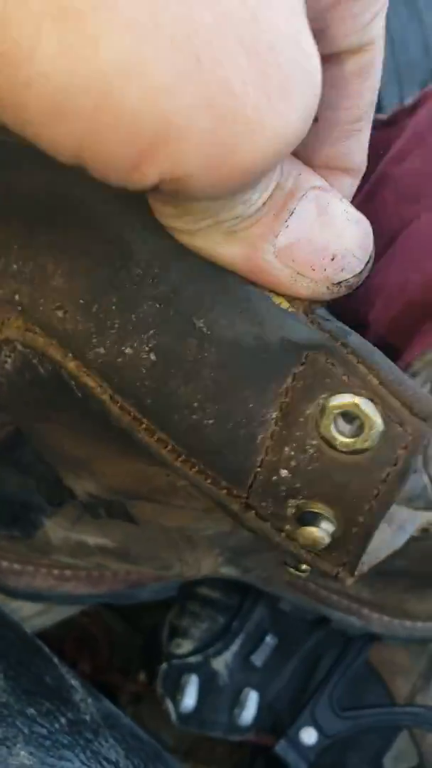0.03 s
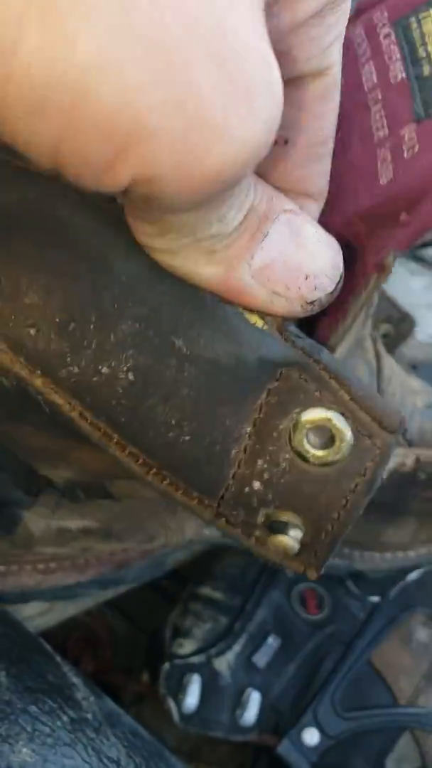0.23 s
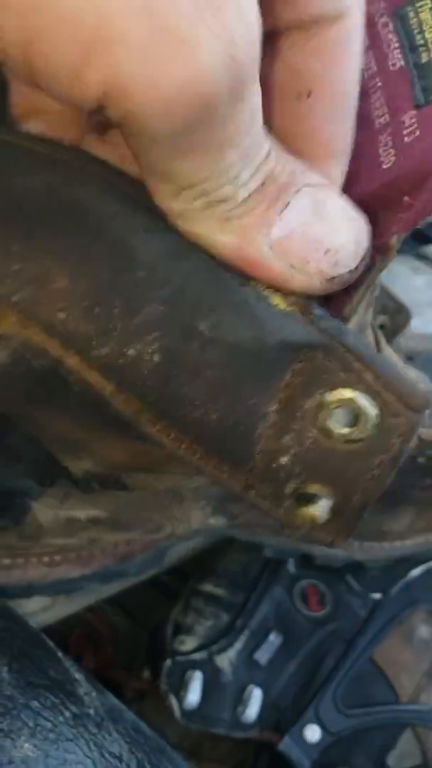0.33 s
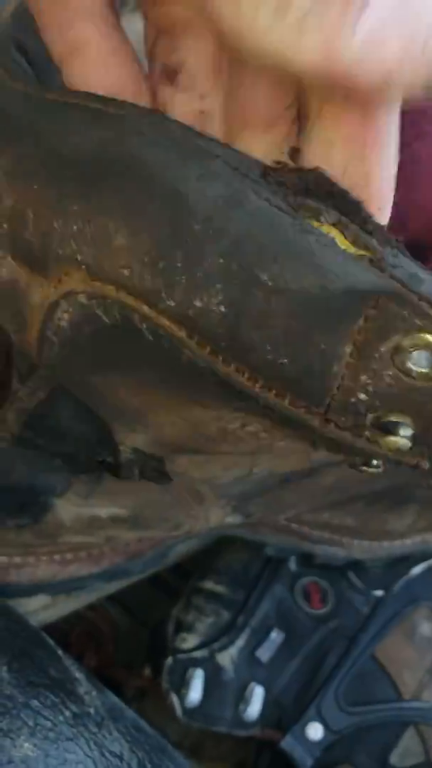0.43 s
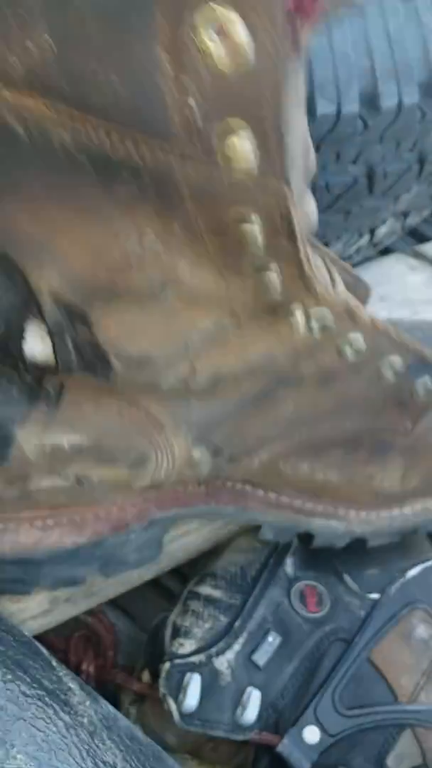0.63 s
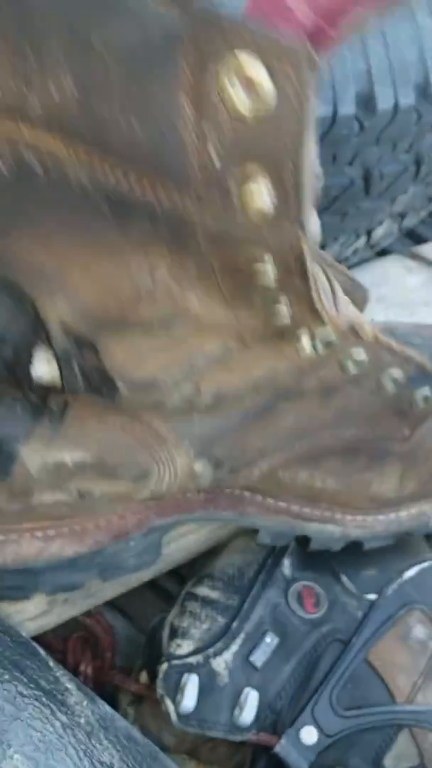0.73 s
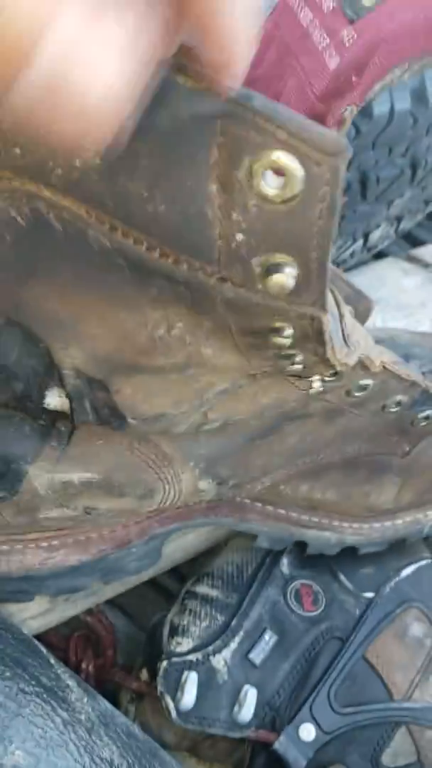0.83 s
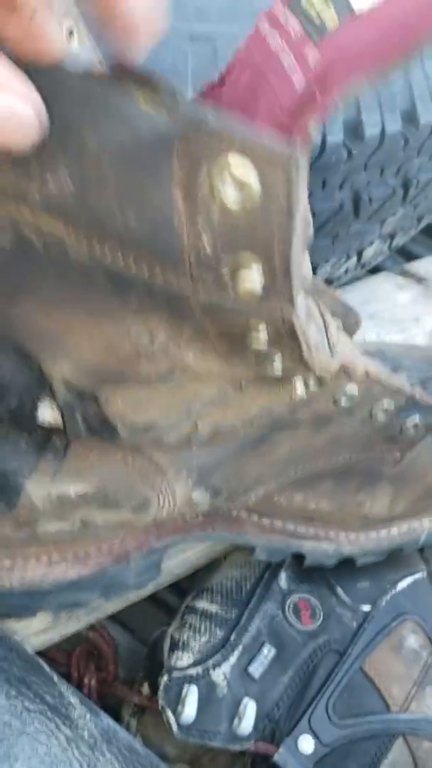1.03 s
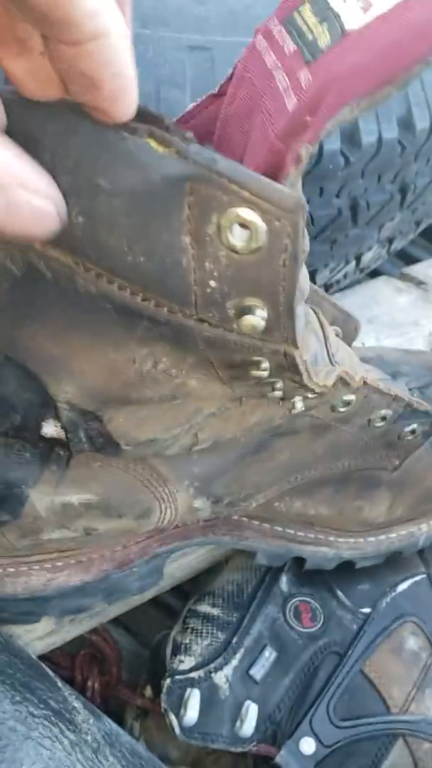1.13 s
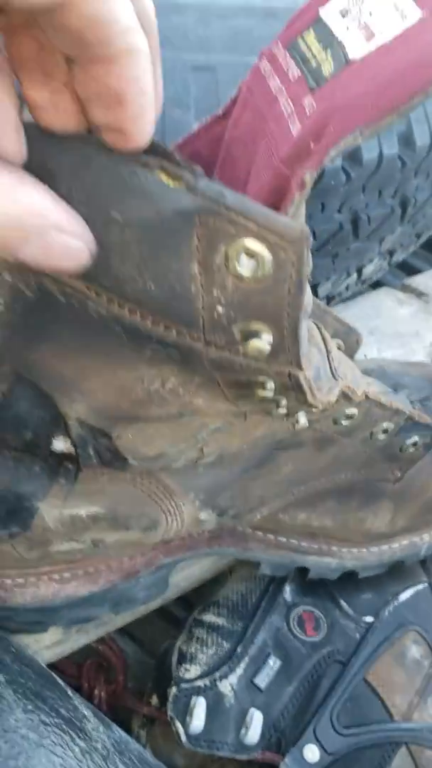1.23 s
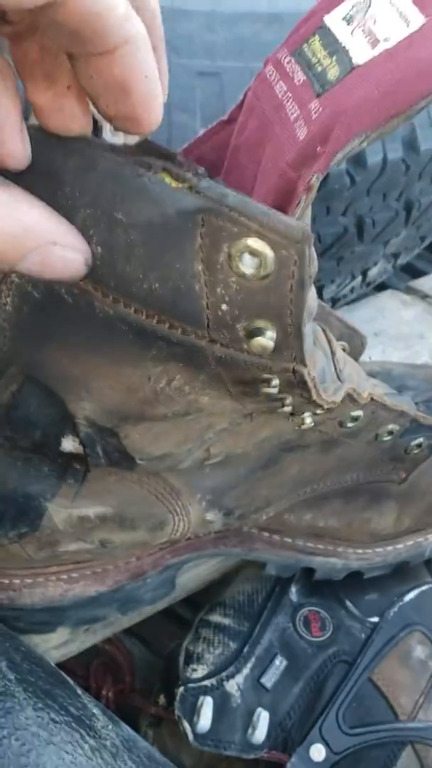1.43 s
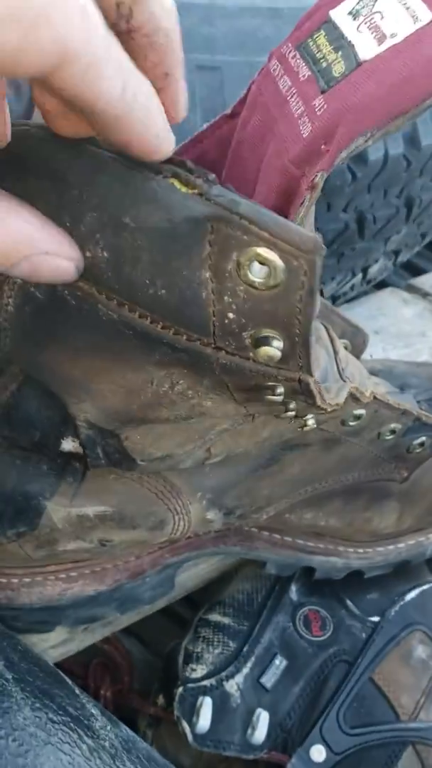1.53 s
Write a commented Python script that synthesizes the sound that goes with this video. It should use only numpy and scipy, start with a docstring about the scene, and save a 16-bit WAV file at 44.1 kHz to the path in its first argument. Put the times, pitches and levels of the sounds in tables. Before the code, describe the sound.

A stiff leather boot is flexed close to a hand-held stereo microphone in a quiet vehicle. Faint rustle and crisp ticks lead to a fast hollow knock at 0.2 s. Leather rubs and creaks briefly around 0.35 and 0.45 s, over low rumbling bumps mostly left. Another rub comes at 0.65 s, a bump with ticks near 0.95 s, then fading thumps to 1.3 s and faint hiss.

```python
"""A stiff leather boot is gripped and flexed close to a hand-held camera in a parked vehicle.
The shaft gives with a hollow knock: a few quick blows, each a set of fading tones.
The leather rubs and rustles as filtered trains of tiny clicks, and its folds creak in short tones.
Creases and metal eyelets tick with noise snaps and tiny rings; a faint hiss swells and fades around them,
with a narrow gliding band of noise. Rumbles and bumps reach mostly the left port, over faint noise."""
import sys
import numpy as np
from scipy import signal
from scipy.fft import rfft, irfft
from scipy.io import wavfile
from scipy.ndimage import uniform_filter1d

SR = 44100
rng = np.random.default_rng(int(sys.argv[2]) if len(sys.argv) > 2 else 0)


def dump_mix(stems):
    """Bounce the given channels to the path in sys.argv[1] as a 16-bit WAV at rate SR."""
    frames = np.atleast_2d(stems).T  # one column per channel
    limited = np.clip(frames, -1, 1)  # hard clip at full scale
    pcm = np.round(limited * 32767).astype(np.int16)
    wavfile.write(sys.argv[1], SR, pcm)


N = 70560  # length in samples, 1.6 s
EDGE_HZ = 16900  # upper limit of the sound


def amp(db):
    """Turns decibels into a gain."""
    return 10 ** (np.asarray(db) / 20)


def evened(x):
    """Scales a signal to an average (rms) strength of 1."""
    return x / np.sqrt(np.mean(x ** 2) + 1e-20)


def panned(pan_db):
    """Left and right gains of constant power; a positive pan makes the left louder."""
    return evened(amp([[pan_db / 2], [-pan_db / 2]]))


def add(mix, s, sound):
    """Mixes a sound in at a time in seconds."""
    part = mix[:, max(round(s * SR), 0):][:, :sound.shape[-1]]
    part += sound[..., :part.shape[1]]


def curve(points, axis=1):
    """Draws straight lines over time through one column of a table."""
    points = np.array(points)
    return np.interp(np.arange(N) / SR, points[:, 0], points[:, axis])


def coloured(x, points, axis=1):
    """Filters a signal by a spectrum drawn on a log-frequency axis."""
    points = np.array(points)
    hz = np.fft.rfftfreq(2 * N, 1 / SR)
    gain = amp(np.interp(np.log(hz + 1), np.log(points[:, 0]), points[:, axis]))
    return irfft(rfft(x, 2 * N) * gain)[..., :N]


def paired(three, same):
    """Makes left and right from one shared and two separate signals; same is the shared power."""
    same = np.clip(same, 0, 1)
    return np.sqrt(same) * three[0] + np.sqrt(1 - same) * three[1:]


def grains(per_s, spread_db, colour, same):
    """A dense train of tiny clicks of uneven size, as in rubbing, is coloured by a filter."""
    unevenness = amp(spread_db * np.minimum(rng.exponential(1, (3, N)), 4))
    size = unevenness * rng.standard_normal((3, N))
    happens = rng.random((3, N)) < per_s / SR
    return evened(coloured(paired(size * happens, same), colour))


def stroke(start, rise, hold, t60):
    """A strength that rises, holds, then falls by 60 dB in t60 seconds."""
    t = np.arange(N) / SR - start
    return np.clip(t / rise, 0, 1) * amp(-60 * np.maximum(t - rise - hold, 0) / t60)


def background():
    """Faint steady noise around the vehicle, partly shared by the two ports."""
    # Colour of the noise. Each row: frequency in Hz, relative level in dB.
    noise_colour = [(20, -13), (60, 8), (150, -26.5), (320, -13), (620, -27), (950, -18.5), (1400, -30.5),
                    (1700, -22), (2000, -43.5), (3200, -34), (5000, -34.5), (9000, -48), (15500, -47),
                    (16500, -65)]
    noise = paired(rng.standard_normal((3, N)), same=0.25)
    return amp(-55.5) * evened(coloured(noise, noise_colour))


def handling():
    """The shifting grip on the camera makes rumbling noise, and grip and leather make soft bumps."""
    # Loudness of the rumble. Each row: time in seconds, left level in dB, right level in dB.
    rumble_level = [(0, -72, -49), (.19, -88, -51.5), (.26, -48.5, -36.5), (.33, -28, -39.5),
                    (.42, -35.5, -37.5), (.46, -28.5, -26.5), (.52, -25.5, -32), (.57, -29, -35.5),
                    (.62, -26, -45), (.69, -36.5, -31.5), (.75, -23.5, -39), (.79, -40.5, -53),
                    (.9, -33.5, -36.5), (1.0, -35.5, -45), (1.08, -30.5, -51), (1.22, -46, -47),
                    (1.36, -40, -46.5), (1.45, -50.5, -47.5), (1.6, -44, -50)]
    # Colour of the rumble. Each row: frequency in Hz, relative level in dB.
    rumble_colour = [(15, -45), (28, -36), (42, 1), (68, 6), (105, 0), (160, -4), (240, -11), (350, -26.5),
                     (550, -39.5), (1200, -44), (4000, -69)]
    # Soft bumps of the grip and of the leather.
    # Each row: centre in seconds, level in dB, pitch in Hz, pan in dB.
    bumps = [(0.311, -28.5, 145, 6.5), (0.345, -21.5, 60.4, 22), (0.455, -19.5, 69.8, 23),
             (0.477, -20, 146, 10), (0.553, -23.5, 66, 31), (0.601, -27.5, 130, 22), (0.627, -24, 88, 18),
             (0.736, -28, 100, 9), (0.77, -27, 57, 24), (0.853, -21, 52.5, 24), (.9336, -35.5, 540, -7),
             (1.0156, -33, 400, -6), (1.063, -39, 282, 20), (0.9782, -14.5, 141, 43),
             (.983, -20.5, 61.2, 29), (1.088, -28, 160, 31), (1.1445, -20.5, 88, 15),
             (1.191, -26.5, 91, 29), (1.240, -30.5, 75, 16), (1.311, -25.5, 196, 42),
             (1.311, -26, 75.6, 16)]
    lump_db, bump_cycles = 4, 0.26  # unevenness in dB; width of a bump in cycles of its pitch

    lumps = uniform_filter1d(rng.standard_normal(N), size=700)
    lumps = evened(uniform_filter1d(lumps, size=500))
    lumpy_noise = rng.standard_normal((2, N)) * amp(lump_db * lumps)
    rumble = evened(coloured(lumpy_noise, rumble_colour))
    # even out the slower swells, over about 41 ms
    rumble /= np.sqrt(uniform_filter1d(rumble ** 2, size=1800, axis=1))
    out = rumble * amp([curve(rumble_level, axis=1), curve(rumble_level, axis=2)])
    for s, db, hz, pan_db in bumps:
        cycles = (np.arange(N) / SR - s) * hz
        swell = np.exp(-.5 * (cycles / bump_cycles) ** 2)
        out -= panned(pan_db) * amp(db) * np.sin(2 * np.pi * cycles) * swell
    return out


def leather():
    """Each rubbing stroke has a dull body and a finer rasp; a soft rustle runs throughout."""
    # Strokes of leather on leather. Each row: start in seconds, rise in seconds, hold in seconds,
    # 60 dB fade in seconds, body level in dB, rasp level in dB, pan in dB.
    rubs = [(0.154, 0.0033, 0.12, 0.031, -51, -59.5, 2), (0.212, 0.0036, 0.058, 0.22, -41.5, -57, 4),
            (0.314, 0.0048, 0.012, 0.093, -45, -65.5, -12.5), (0.357, 0.0066, .008, 0.45, -44.5, -57.5, -8),
            (0.438, 0.0077, 0.028, 0.28, -33, -63.5, -0.5), (0.656, 0.0065, 0.0052, 0.16, -34, -64, -5),
            (0.969, 0.0029, 0.0091, 0.031, -34, -60, 8.5), (0.996, 0.012, .002, 0.14, -45, -49.5, 2),
            (1.06, 0.09, 0.016, .1, -70, -77, 13)]
    # Colours of body and rasp. Each row: frequency in Hz, relative level in dB.
    body_colour = [(30, -32), (90, -5), (200, 6.5), (400, -4), (600, -13.5), (800, -22.5), (1100, -23),
                   (2000, -27), (3200, -44), (8000, -61)]
    rasp_colour = [(500, 7), (1200, 7.5), (2200, 3), (3200, 5), (4500, 2), (7000, -14), (10000, -43),
                   (16000, -46)]
    # A soft rustle while the shaft is in motion. Each row: time in seconds, level in dB.
    rustle_level = [(0, -56), (.14, -53), (.35, -50), (.56, -55), (.75, -50.5), (.92, -48), (1.1, -52),
                    (1.2, -66), (1.6, -58)]
    # Colour of the rustle. Each row: frequency in Hz, relative level in dB.
    rustle_colour = [(100, 12.5), (350, 4), (700, -10), (1200, -6.5), (1700, -14), (2200, -8), (3200, -19),
                     (6000, -24), (16000, -41)]
    slips_per_s, spread_db = 5700, 3.5

    body = grains(slips_per_s, spread_db, body_colour, same=0.67)
    rasp = grains(slips_per_s, spread_db, rasp_colour, same=0.18)
    rustle = grains(slips_per_s, spread_db=1.5, colour=rustle_colour, same=0.29)
    out = amp(curve(rustle_level)) * rustle
    for s, rise, hold, t60, body_db, rasp_db, pan_db in rubs:
        rub = amp(body_db) * body + amp(rasp_db) * rasp
        out += panned(pan_db) * stroke(s, rise, hold, t60) * rub
    return out


def surrounding_hiss():
    """A faint hiss from the surroundings swells and fades, made of very dense tiny clicks."""
    # Swells of the hiss. Each row: start in seconds, rise in seconds, hold in seconds,
    # 60 dB fade in seconds, level in dB, pan in dB.
    swells = [(0.04, 0.15, 0.038, 0.22, -58, -2.5), (0.425, 0.074, 0.0072, 0.058, -57, 2.5),
              (0.622, 0.037, 0.0046, 0.29, -60.5, 4), (0.733, 0.044, .15, 0.55, -63.5, -14),
              (1.31, 0.18, .12, .3, -63, -8.5)]
    # Colour of the hiss. Each row: frequency in Hz, relative level in dB.
    hiss_colour = [(800, -1.5), (1850, -17), (2130, 11.5), (2500, 3.5), (3600, -10), (4050, 4), (4450, 2),
                   (5200, -0.5), (7300, -4), (8500, -5), (9800, -3.5), (12500, -6.5), (15500, -16),
                   (16200, -35)]
    hiss = grains(per_s=10000, spread_db=-2.5, colour=hiss_colour, same=0.083)
    strength = np.zeros((2, N))
    for s, rise, hold, t60, db, pan_db in swells:
        strength += panned(pan_db) * amp(db) * stroke(s, rise, hold, t60)
    return hiss * strength


def ticks():
    """Each tick of a crease or eyelet is a broad snap of noise and a very short ring."""
    # Each row: start in seconds, ring level in dB, ring pitch in Hz, snap level in dB,
    # top of the snap's band in Hz, pan in dB.
    tick_rows = [(0.0704, -50, 6600, -43, 7160, 2), (.0962, -46.5, 4900, -41, 7440, -1),
                 (.1200, -60, 6300, -38, 12000, 16), (0.1516, -42, 8440, -32.5, 14000, 1),
                 (0.1545, -40, 5230, -29, 4020, 11), (0.1642, -43, 5440, -33.5, 13700, 3),
                 (0.1948, -32.5, 12600, -24, 15300, -1.5), (0.1967, -38.5, 4700, -34, 4500, -5),
                 (0.3317, -55, 5000, -37, 4020, 12), (0.447, -36.5, 4670, -27, 3550, 5),
                 (0.4545, -46, 4020, -20, 2530, 16), (0.7599, -41.5, 5200, -32.5, 13000, -1),
                 (0.7635, -34, 15200, -45, 16200, -21), (.7672, -53, 14800, -42, 15100, -1),
                 (.8470, -36.5, 6760, -36.5, 9600, -5), (0.9321, -30, 4700, -24.5, 3040, -13),
                 (.9704, -37, 2700, -36, 3000, -5), (0.9768, -41, 4270, -46, 3470, -17),
                 (0.978, -52, 15200, -48, 15000, -21), (0.9813, -33.5, 2480, -47, 2500, 1),
                 (1.0129, -38, 4300, -23, 3270, -39), (1.3525, -40, 6480, -42, 13500, 4)]
    rise_s, ring_t60_s, snap_t60_s = 0.00046, 0.00093, 0.0019  # t60 is the time to fall by 60 dB
    snap_width_ratio = 8.5  # top of the snap's band over its bottom

    out, t = np.zeros((2, N)), np.arange(SR // 50) / SR
    for s, ring_db, hz, snap_db, top_hz, pan_db in tick_rows:
        # each port hears the ring at its own point in the cycle
        ring = np.sin(2 * np.pi * (hz * t + rng.random((2, 1)) / 3))
        ring *= np.sin(np.pi / 2 * np.minimum(t / rise_s, 1)) ** 2
        ring *= amp(-60 * (np.maximum(t - rise_s, 0) / ring_t60_s) ** 2)
        burst = paired(rng.standard_normal((3, len(t))), same=0.096) * amp(-60 * t / snap_t60_s)
        band_hz = min(top_hz, EDGE_HZ) * np.array([1 / snap_width_ratio, 1])
        snap = signal.lfilter(*signal.butter(2, band_hz, "bandpass", fs=SR), burst)
        add(out, s, panned(pan_db) * (amp(ring_db) * ring + amp(snap_db) * snap))
    return out


def cabin(x):
    """The vehicle's interior adds short, dense reflections, made as a fading tail of noise."""
    room_db, t60_s = -3.5, 0.038  # level of the tail; its time to fall by 60 dB
    t = np.arange(SR // 5) / SR
    tail = rng.standard_normal((2, len(t))) * amp(-60 * t / t60_s)
    tail /= np.linalg.norm(tail[0])
    return x + amp(room_db) * signal.fftconvolve(x, tail, axes=1)[:, :N]


def knock():
    """The stiff shaft gives way in quick blows that ring its damped hollow."""
    # Blows of the hollow knock. Each row: start in seconds, level in dB, pitch in Hz.
    blows = [(0.219, -14.5, 193), (0.2277, -13.5, 212.3), (.2470, -23.5, 155.4), (0.261, -26.5, 238.2)]
    # Tones that the boot shaft rings with.
    # Each row: multiple of the pitch, level in dB, 60 dB fade in seconds.
    shaft_tones = [(1, 0, 0.063), (1.8, -6, 0.097), (2.65, -16.5, 0.064), (4.3, -29.5, 0.034)]
    rise_s, left_lag_s = 0.0006, 0.00032  # softness of the onset; delay of the left port

    out, t = np.zeros((2, N)), np.arange(SR // 4) / SR
    t = np.maximum(t - np.array([[left_lag_s], [0]]), 0)
    for s, db, hz in blows:
        ring = 0
        for ratio, level, t60 in shaft_tones:
            ring = ring + amp(level - 60 * t / t60) * np.sin(2 * np.pi * hz * ratio * t)
        add(out, s, -amp(db) * ring * (1 - np.exp(-t / rise_s)))
    return out


def creaks():
    """A fold of leather creaks in quick uneven slips, each ringing for a few cycles."""
    # Each row: start in seconds, length of the run of slips in seconds, level in dB, mean pitch in Hz.
    creak_rows = [(0.332, 0.0071, -43, 1050), (.371, .009, -41.5, 1105), (0.448, .012, -34, 604),
                  (0.46, .028, -39.5, 926), (0.668, 0.0055, -52.5, 1620), (1.097, .008, -49.5, 830)]
    slips_per_s, t60_s, scatter = 450, .007, .16  # scatter of the pitch, as a fraction

    out, t = np.zeros((2, N)), np.arange(SR // 50) / SR
    for s, length, db, hz in creak_rows:
        for k, (late, detune, size, side) in enumerate(rng.standard_normal((24, 4))):
            if k < length * slips_per_s:
                tone = np.sin(2 * np.pi * hz * (1 + scatter * detune) * t)
                slip = tone * amp(db + 2 * size - 60 * t / t60_s)
                add(out, s + (k + .3 * late) / slips_per_s, panned(2 * side - 3) * slip)
    return out


def whistle():
    """A faint narrow band of high noise glides, rises and falls, perhaps as a moving hand reflects hiss."""
    # Each row: time in seconds, centre of the band in Hz, level in dB.
    glide = [(.76, 9270, -100), (.80, 9500, -66), (.88, 10000, -69), (.95, 9700, -74), (1.0, 9100, -100)]
    width_hz = 400
    noise = rng.standard_normal((2, N)) + 1j * rng.standard_normal((2, N))
    band = signal.sosfilt(signal.butter(2, width_hz / 2, fs=SR, output="sos"), noise)
    # turning the slow noise moves it up to the gliding centre
    turns = np.cumsum(curve(glide, axis=1)) / SR
    moved = evened((band * np.exp(2j * np.pi * turns)).real)
    return panned(pan_db=-1) * amp(curve(glide, axis=2)) * moved


def scene():
    """All sources add up at the two ports."""
    boot = knock() + leather() + creaks()
    hisses = surrounding_hiss() + whistle()
    return boot + hisses + cabin(ticks()) + handling() + background()


def record(dry):
    """Each port colours the sound in its own way; then a low-pass filter limits the treble."""
    # Colour of the two ports. Each row: frequency in Hz, left gain in dB, right gain in dB.
    port_colour = [(17.4, -11, -24), (31.2, -27.5, 2), (43.4, 4, 1.5), (1110, -0.5, 1), (2080, -8.5, -2),
                   (3480, -10, -11.5), (4500, -8.5, -3), (6500, -2.5, -5.5), (7660, 5.5, -7),
                   (8200, -5, -6.5), (9760, -5, -3.5), (13900, 6, 4.5)]
    heard = np.array([coloured(dry[0], port_colour, axis=1), coloured(dry[1], port_colour, axis=2)])
    low_pass = signal.firwin(511, EDGE_HZ, window=("kaiser", 9), fs=SR)
    return signal.oaconvolve(heard, low_pass[None], "same")


dry = scene()
out = record(dry)
dump_mix(out)
```